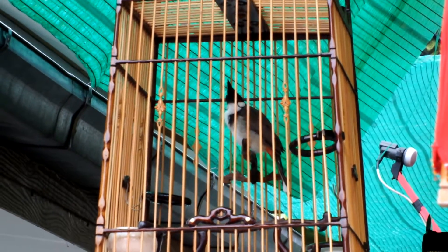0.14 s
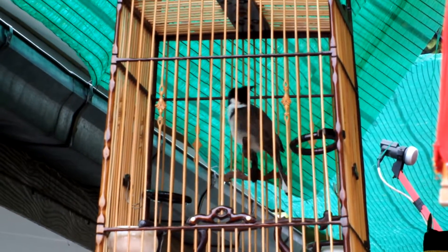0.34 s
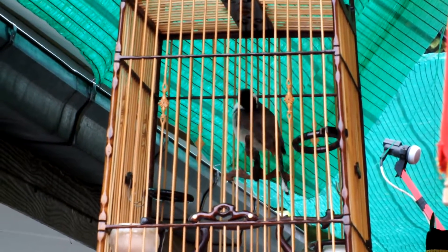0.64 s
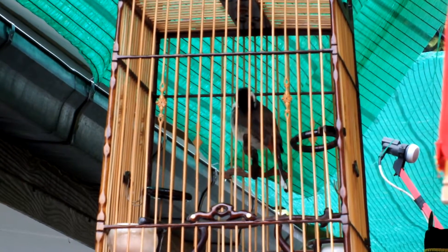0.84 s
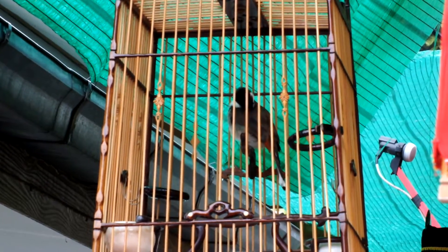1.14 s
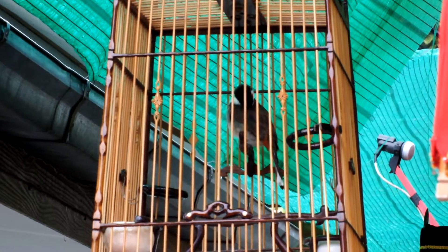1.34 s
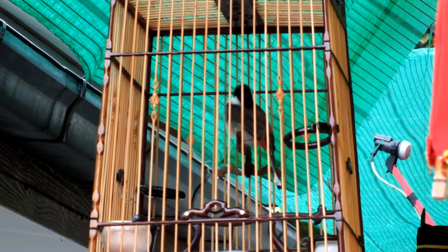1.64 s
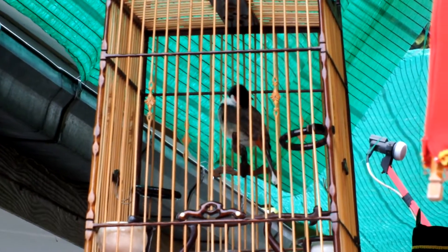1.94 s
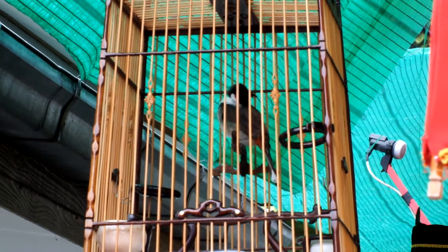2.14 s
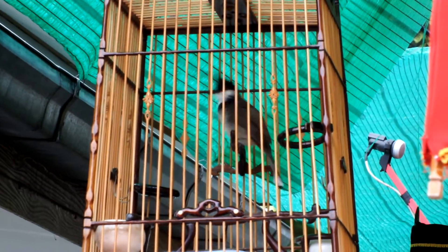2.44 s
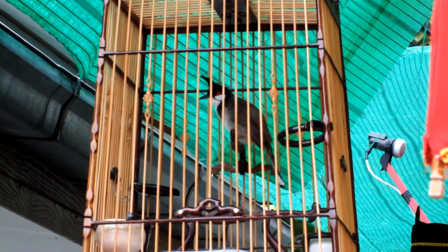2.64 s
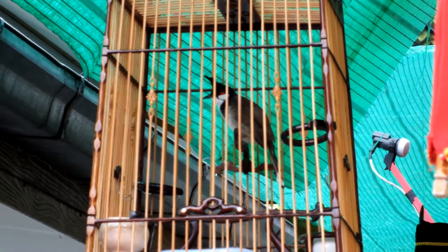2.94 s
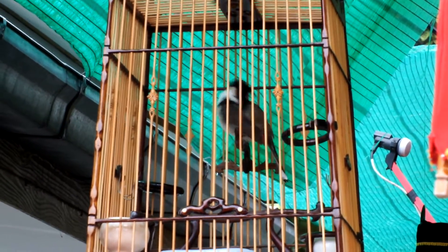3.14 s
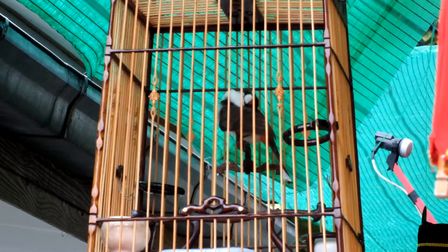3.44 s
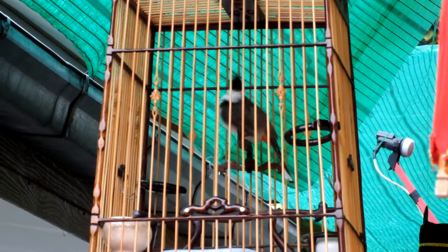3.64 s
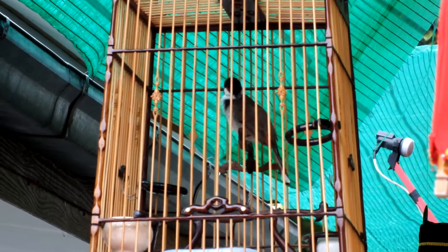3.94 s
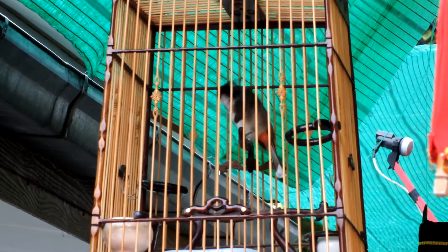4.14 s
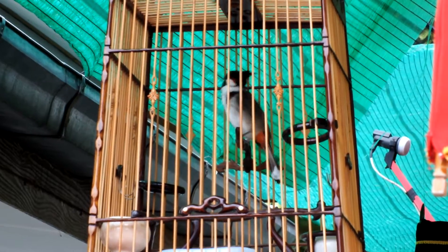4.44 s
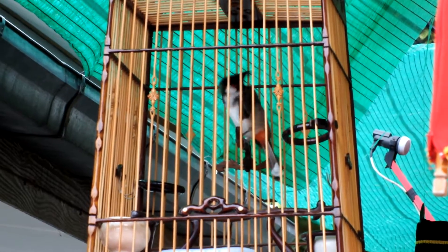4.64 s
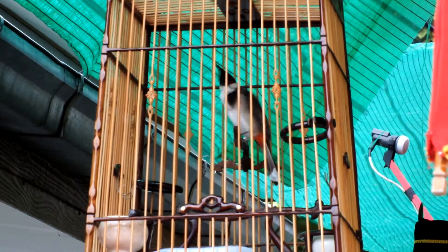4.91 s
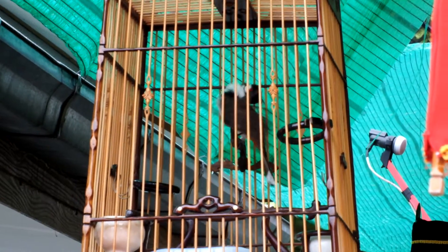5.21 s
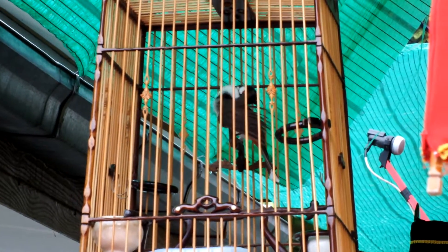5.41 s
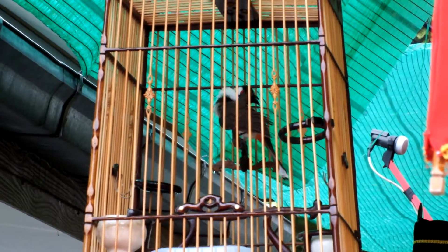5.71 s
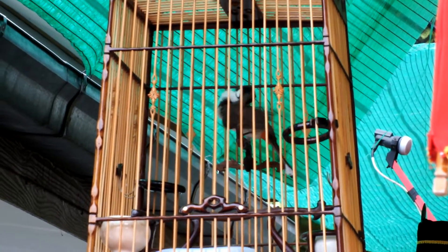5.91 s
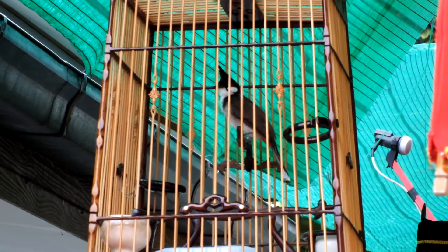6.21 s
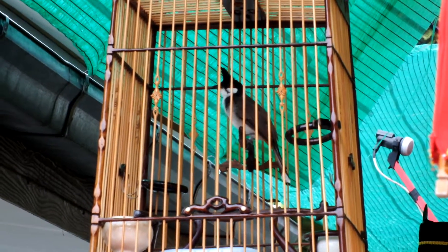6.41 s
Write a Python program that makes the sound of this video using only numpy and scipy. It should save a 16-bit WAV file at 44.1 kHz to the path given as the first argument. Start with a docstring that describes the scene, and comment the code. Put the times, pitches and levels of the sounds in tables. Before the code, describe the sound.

A small bird in a cage, close and slightly right, sings rapid clear whistles with a few harsh, buzzy notes. Its first phrase runs over a second, the next follows after a pause, and a final one comes late. Light feet knock on a wooden perch. Faint birds answer between phrases, and a distant dove coos. Low traffic and a thin insect hiss lie beneath, in a covered yard with short, diffuse echoes.

```python
"""Caged bulbul under a netted roof

A caged bulbul sings quick phrases of sliding sine notes; noise echoes of cage, roof and yard smear each one.
Its feet knock on a wooden perch. Other birds and a dove, sines too, answer from further off.
Shaped noise makes the insect's hiss near 7.5 kHz and the distant traffic, with low engine tones beneath."""
import sys
import numpy as np
from scipy import signal
from scipy.fft import rfft, irfft, next_fast_len
from scipy.io import wavfile
from scipy.ndimage import uniform_filter1d, map_coordinates

SR = 44100
rng = np.random.default_rng(int(sys.argv[2]) if len(sys.argv) > 2 else 0)


def wrap_up_sound(samples):
    """Save the sound to the file named by the first command line argument, as 16-bit audio."""
    columns = np.atleast_2d(samples).T
    # keep every value between -1 and 1, then stretch to whole-number steps
    tamed = np.clip(columns, -1, 1)
    steps = np.round(tamed * 32767).astype(np.int16)
    wavfile.write(sys.argv[1], SR, steps)


N = 289737

LAG = 4.2 / SR  # s; the bulbul sits to the right, so the left channel hears it later
# places for heard(): birds further off on the right, and the dove and low whistle
FURTHER = dict(direct_db=12.5, near_db=13.0, yard_db=2, left_db=-4, lag=LAG)
DOVE_PLACE = dict(direct_db=5.0, near_db=-9, yard_db=-0.5, left_db=1.0, lag=0)


def amp(db):
    """Decibels to a linear factor."""
    return 10 ** (np.asarray(db) / 20)


def unit(x):
    """Scales to an rms of 1."""
    return x / np.sqrt(np.mean(x ** 2) + 1e-20)


def along(points, hz):
    """Reads a curve of (Hz, value) points on a log frequency axis."""
    f, v = np.transpose(points)
    return np.interp(np.log(hz + 1), np.log(f + 1), v)


def wobble(rate, size):
    """A smooth random curve, rate knots a second."""
    knots = rng.standard_normal(int(size * rate / SR) + 4)
    return map_coordinates(knots, [np.arange(size) * rate / SR])


def filtered(x, response):
    """Multiplies the spectrum of x by a complex response of frequency."""
    n = x.shape[-1]
    m = next_fast_len(n + 2048)
    return irfft(rfft(x, m) * response(np.fft.rfftfreq(m, 1 / SR)), m)[..., :n]


def rush(spectrum, patchy_db):
    """Stereo noise of rms 1 with patches of random gain over time and frequency."""
    # left-right likeness of broad noise: pitch_hz, correlation (0 to 1)
    likeness = [(60, 0.91), (170, 0.26), (470, 0.67), (2000, 0), (7000, 0)]
    z = signal.stft(rng.standard_normal((2, N)), nperseg=512)[2]
    field = uniform_filter1d(rng.standard_normal(z.shape[1:]), size=6, axis=0)
    field = uniform_filter1d(field, size=14, axis=1)
    pair = signal.istft(z * amp(patchy_db * unit(field)), nperseg=512)[1][:, :N]

    def mid_side(hz):
        turn = np.arccos(np.clip(along(likeness, hz), -1, 1)) / 2
        return amp(along(spectrum, hz)) * [np.cos(turn), np.sin(turn)]

    mid, side = filtered(pair, mid_side)
    return unit(np.array([mid + side, mid - side]))


def whistle(rows, edge=0.0022):
    """One note from (s, Hz, dB) points: an unsteady sine, weak overtones, a little air; edge fades in s.

    A fourth column (Hz) adds a second oscillator."""
    # what beak and microphone leave of overtones and air noise: pitch_hz, gain_db
    treble = [(3200, 13.5), (5000, -10), (8000, -21.5), (12000, -7), (14500, -18.5), (16000, -19.5)]
    s, *cols = np.transpose(rows)
    t = np.arange(s[0], s[-1] + edge, 1 / SR)
    hz, db, *second = [np.interp(t, s, c) for c in cols]
    phase = 2 * np.pi * np.cumsum(hz * (1 + 0.013 * wobble(200, len(t)))) / SR
    voice, air_db = np.sin(phase), -43
    if second:  # its beat puts a side tone its own rate above and below the pitch, and more air escapes
        air_db = -36
        beat_hz = second[0] * (1 + 0.2 * wobble(400, len(t)))
        voice = voice * (1 + 1.47 * np.sin(2 * np.pi * np.cumsum(beat_hz) / SR))
    overtones = sum(amp(along(treble, k * hz)) * np.sin(k * phase) for k in range(2, 7))
    air = unit(filtered(rng.standard_normal(len(t)), lambda f: amp(along(treble, f)) * (f > 4500)))
    fade = np.clip(np.minimum(t - t[0], t[-1] - t) / edge, 0, 1)
    envelope = amp(db + 2.75 * wobble(90, len(t))) * np.sin(fade * np.pi / 2) ** 2  # level flutters
    return envelope * (voice + amp(-29) * overtones + amp(air_db) * air)


def heard(note, direct_db, near_db, yard_db, left_db, lag):
    """Direct sound, dense quick echoes of cage and roof, and the slower tail of the yard; new for each note."""
    t = np.arange(SR // 2) / SR
    # 60 dB decay in 0.13 s near by, 0.52 s in the yard
    shape = amp(near_db) * unit(amp(-60 * t / 0.13)) + amp(yard_db) * unit(amp(-60 * t / 0.52))
    shared, own = rng.standard_normal(len(t)), rng.standard_normal((2, len(t)))
    echoes = (0.75 * shared + 1.17 * own) * shape * np.clip(t / 0.0049, 0, 1) / np.sqrt(len(t))
    # echoes lose treble
    echoes = filtered(echoes, lambda f: amp(-18 * np.clip(np.log2((f + 1) / 4500), 0, 1)))
    echoes[:, 0] = amp(direct_db)
    left, right = signal.fftconvolve(note[None], echoes, axes=1)
    # chance colours the echoes, but the paths together always pass the same energy
    passed = np.hypot(np.linalg.norm(left), np.linalg.norm(right))
    steady = np.linalg.norm(note) * np.linalg.norm(echoes) / passed
    left = amp(left_db) * filtered(left, lambda f: np.exp(-2j * np.pi * f * lag))
    return steady * np.array([left, right])


def add(mix, s, sound):
    """Mixes a sound in at s seconds."""
    part = mix[:, round(s * SR):][:, :sound.shape[1]]
    part += sound[:, :part.shape[1]]


def perform(notes, edge, **place):
    """Whistles each note and sets it in its place."""
    mix = np.zeros((2, N))
    for rows in notes:
        add(mix, rows[0][0], heard(whistle(rows, edge), **place))
    return mix


def traffic():
    """Distant traffic: patchy broadband noise, strongest in the bass, whose level wavers."""
    # pitch_hz, relative density_db per Hz
    spectrum = [(20, -33.5), (60, -2), (135, -11), (170, -4), (700, -11), (2000, -18.5), (4140, -23),
                (5400, -43), (7000, -45.5)]
    return amp(-49.5 + 0.75 * wobble(13, N)) * rush(spectrum, patchy_db=2.0)


def engine_tones():
    """A passing engine's gliding low sine over wavering hums, each narrow-band noise."""
    # the passing tone: time_s, pitch_hz, level_db before a 1.5 dB cut and light smoothing
    passing = [(0.0, 69.26, -51.5), (0.967, 73.1, -43), (1.348, 66.8, -51)]
    # the hums: pitch_hz, half-width_hz at half amplitude, level_db
    hums = [(53.6, 2.5, -60.5), (115.8, 15, -59)]
    t = np.arange(N) / SR
    s, hz, db = np.transpose(passing)
    phase = 2 * np.pi * np.cumsum(np.interp(t, s, hz)) / SR
    drone = amp(np.interp(t, s, db, right=-120) - 1.5) * np.sin(phase)
    mix = uniform_filter1d(drone, size=200)
    for centre, width, level_db in hums:
        band = filtered(rng.standard_normal(N), lambda f: 1 / (1 + ((f - centre) / width) ** 2))
        mix = mix + amp(level_db) * unit(band)
    return mix


def insect():
    """An insect's narrow band of noise, with faint hiss above; its level wavers slightly."""
    # pitch_hz, relative density_db per Hz
    spectrum = [(6700, -15), (7200, -6), (7600, -2.5), (8200, -21), (15000, -53.5)]
    return amp(-64.5 + 0.35 * wobble(8.2, N)) * rush(spectrum, patchy_db=0.8)


def sung(s, slide, hold, from_hz, reached_hz, last_hz, db):
    """Turning points (s, Hz, dB) of a note: a slide that swells, then a held pitch that settles and fades."""
    hold_fade_db = 6  # lost over the held part
    # a held pitch drifts fastest at first: this share of the drift is done after this share of the hold
    settle_time, settle_drift = .4, .62
    soft_db = 25 * abs(np.log2(from_hz / reached_hz))  # the wider a slide, the softer it starts (dB/octave)
    settled_hz = reached_hz + settle_drift * (last_hz - reached_hz)
    return np.array([
        (s, from_hz, db - soft_db),
        (s + slide, reached_hz, db),
        (s + slide + settle_time * hold, settled_hz, db - settle_time * hold_fade_db),
        (s + slide + hold, last_hz, db - hold_fade_db),
    ])


def bulbul():
    """The near bird's two voices, which may overlap: clear sliding notes, and harsh ones with a beating tone."""
    # clear notes: start_s, slide_s, hold_s, slide_from_hz, reached_hz, last_hz, level_db before its place
    song = [ (0.0, 0.00067, 0.036, 3750, 3447, 3310, -21), (0.087, 0.024, 0.089, 1620, 3017, 2663, -17),
            (0.413, 0.063, 0.04, 2085, 2244, 2220, -21.5), (0.526, 0.015, 0.022, 2860, 2060, 2056, -19),
            (0.555, 0.026, 0.012, 2558, 2660, 2520, -20), (0.573, 0.01, 0.043, 2790, 3490, 3257, -16.5),
            (0.669, 0.014, .02, 1470, 2176, 2220, -20.5), (0.689, 0.0069, 0.038, 2285, 2840, 2930, -18),
            (0.771, 0.016, .08, 3220, 2560, 2532, -17), (0.825, 0.052, 0.0041, 1338, 2413, 2520, -18),
            (0.874, 0.012, 0.091, 2400, 2077, 1960, -25), (0.873, 0.0069, 0.052, 3430, 3090, 2924, -20),
            (.955, .03, .055, 1500, 1764, 2000, -23.5), (1.268, 0.041, 0.0042, 1413, 1702, 1780, -25),
            (1.312, .013, 0.062, 1767, 2637, 2731, -11.5), (2.475, .01, 0.053, 2360, 2525, 2406, -13.5),
            (2.518, .01, 0.057, 3054, 2990, 2740, -17.5), (2.574, 0.02, 0.072, 2140, 1980, 2065, -22.5),
            (2.679, 0.0052, 0.02, 3140, 3010, 2670, -14.5), (2.707, 0.011, 0.036, 2044, 2465, 2288, -14.5),
            (2.812, 0.01, 0.013, 2455, 2810, 3020, -14), (2.833, .025, .07, 3930, 3606, 3463, -16.5),
            (2.98, 0.0066, .05, 3380, 3547, 3544, -21.5), (3.168, 0.03, 0.0022, 1526, 2846, 2810, -14.5),
            (3.172, 0.02, 0.0033, 2530, 2930, 3050, -25.5), (3.192, 0.013, 0.1, 2990, 3276, 3228, -16.5),
            (3.293, 0.0054, 0.017, 2170, 2230, 2143, -22.5), (3.304, 0.006, 0.042, 2275, 2710, 2460, -13.5),
            (3.517, 0.0074, 0.078, 1830, 2822, 2314, -14), (3.816, 0.0073, 0.042, 2795, 2636, 2028, -15.5),
            (3.878, 0.006, 0.051, 2070, 2242, 2498, -16), (5.345, .008, 0.0021, 1865, 2900, 2960, -18.5),
            (5.354, 0.02, .075, 1970, 2367, 2500, -22.5), (5.526, 0.0088, 0.028, 2765, 3080, 2690, -16),
            (5.546, .027, 0.029, 2056, 2397, 2420, -16), (5.66, 0.0077, 0.011, 2140, 3086, 3030, -12),
            (5.691, 0.013, .068, 4315, 3764, 3485, -16.5), (5.885, 0.0078, 0.035, 2970, 2280, 2240, -17),
            (5.902, 0.0055, 0.021, 2140, 1965, 1997, -18), (5.961, .017, 0.048, 1517, 2395, 2511, -14),
            (5.999, 0.012, 0.0071, 2720, 2900, 2700, -20), ]
    # harsh notes with a second oscillator, same columns:
    # start_s, slide_s, hold_s, slide_from_hz, reached_hz, last_hz, level_db before its place
    rattles = [ (0.32, 0.023, 0.069, 2300, 3136, 2876, -21.5), (2.517, 0.0042, 0.11, 3460, 3456, 2590, -20),
               (2.936, .015, .04, 2815, 2966, 3280, -21), (5.369, 0.005, 0.092, 3400, 3225, 2714, -18), ]
    notes = [sung(*row) for row in song]
    for row in rattles:
        rows = sung(*row)
        # the second oscillator slows through the note (Hz)
        beat_hz = np.interp(rows[:, 0], rows[[0, -1], 0], [322.7, 188])
        notes.append(np.c_[rows, beat_hz])
    return perform(notes, edge=0.0022, direct_db=-3, near_db=-2, yard_db=-10, left_db=-5, lag=LAG)


def hops():
    """Feet land on the wooden perch: each a decaying noise burst through a dull resonance, applied twice."""
    # start_s, level_db before an 11.5 dB boost, the resonance and its place
    landings = [(0.113, -38), (0.564, -40), (1.649, -40.5), (3.301, -30)]
    mix, t = np.zeros((2, N)), np.arange(SR // 50) / SR

    def wood(f):  # centre 1050 Hz, width 600 Hz
        return (1j * f * 600 / (1050 ** 2 - f * f + 1j * f * 600)) ** 2

    for s, db in landings:
        knock = filtered(rng.standard_normal(len(t)) * amp(-60 * t / 0.04), wood)
        sound = amp(db + 11.5) * knock
        add(mix, s, heard(sound, direct_db=1.0, near_db=-21.0, yard_db=-19.0, left_db=-2.0, lag=LAG))
    return mix


def far_pips():
    """One far bird's short pip on a level pitch."""
    # start_s, level_db before its place
    calls = [(.23, -50), (1.064, -51), (3.843, -49.5), (4.682, -43.5)]
    pip_s, pip_hz = 0.0099, 3490
    notes = [[(s, pip_hz, db), (s + pip_s, pip_hz, db)] for s, db in calls]
    return perform(notes, edge=0.0006, **FURTHER)


def neighbours():
    """Further birds reply: each note slides to its last pitch, then holds it briefly."""
    # start_s, first_hz, last_hz, level_db before its place
    replies = [ (1.248, 2480, 2595, -52), (1.383, 1800, 2116, -51.5), (1.485, 3150, 2806, -48.5),
               (1.527, 2367, 2208, -45), (2.045, 1600, 2480, -63), (3.356, 3370, 2940, -52.5),
               (3.697, 3530, 3920, -61.5), (4.185, 2996, 3168, -44), (4.399, 2395, 2390, -52.5),
               (4.499, 3076, 2690, -50.5), (4.534, 3310, 4130, -58.5), (4.63, 3060, 2970, -59),
               (4.864, 2677, 2527, -50), (3.666, 2950, 2346, -51.5), (4.028, 2443, 2580, -56), ]
    slide_s, length_s = 0.036, 0.0397
    notes = [[(s, first_hz, db), (s + slide_s, last_hz, db), (s + length_s, last_hz, db)]
             for s, first_hz, last_hz, db in replies]
    return perform(notes, edge=0.0006, **FURTHER)


def dove():
    """A far dove's broken coos, each sliding to a pitch and holding it."""
    # start_s, length_s, first_hz, last_hz
    coos = [ (2.464, 0.055, 907, 1198), (2.598, 0.036, 1176, 1165), (2.651, 0.045, 1125, 1082),
            (2.752, 0.092, 1153, 1073), (2.992, 0.093, 1103, 1118), (6.241, 0.065, 909, 1182),
            (6.321, 0.056, 1204, 1164), (6.39, 0.036, 1205, 1138), (6.443, 0.037, 1120, 1077),
            (6.531, 0.038, 993, 1134), ]
    slide_share, db = 0.73, -52.5  # share of a coo spent sliding; level before its place
    notes = [[(s, first_hz, db), (s + slide_share * length, last_hz, db), (s + length, last_hz, db)]
             for s, length, first_hz, last_hz in coos]
    return perform(notes, edge=0.0028, **DOVE_PLACE)


def low_whistle():
    """A far, low whistle that rises slowly in pitch."""
    # time_s, pitch_hz, level_db before its place
    hoot = [(3.55, 735, -77.5), (3.75, 767, -51), (3.92, 776, -55), (4.12, 804, -70.5)]
    return perform([hoot], edge=0.0028, **DOVE_PLACE)


def far_chips():
    """A far bird's evenly spaced falling chips, mostly heard through the yard's tail."""
    starts_s = 4.632 + .303 * np.arange(7)
    notes = [[(s, 6700, -62), (s + .025, 5400, -61), (s + .05, 3000, -60)] for s in starts_s]
    return perform(notes, edge=0.0022, direct_db=-2.5, near_db=-10.0, yard_db=12.5, left_db=-1.5, lag=0)


def scene():
    """All layers together."""
    background = traffic() + engine_tones() + insect()
    near = bulbul() + hops()
    far = far_pips() + neighbours() + dove() + low_whistle() + far_chips()
    return background + near + far


def record(dry):
    """Nothing is kept above the band limit of 15.7 kHz."""
    return filtered(dry, lambda hz: hz < 15700)


dry = scene()
out = record(dry)
wrap_up_sound(out)
```